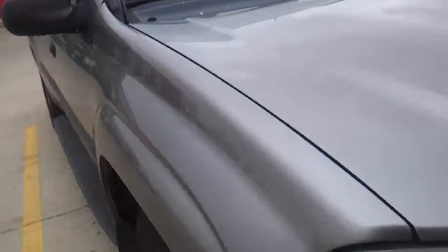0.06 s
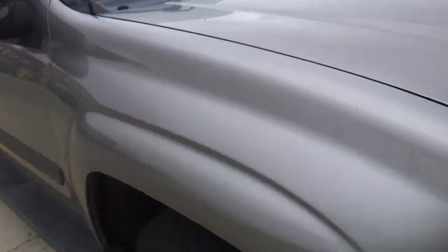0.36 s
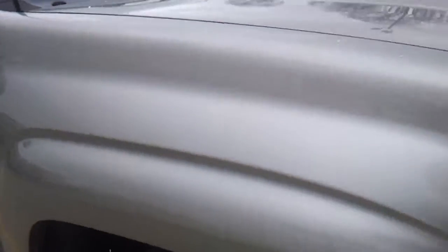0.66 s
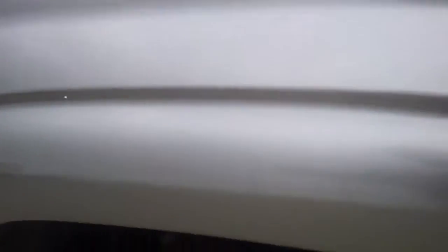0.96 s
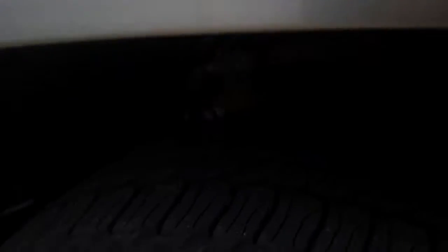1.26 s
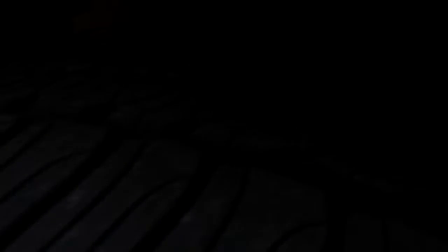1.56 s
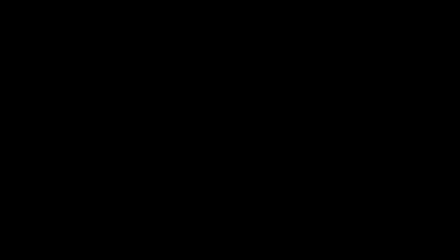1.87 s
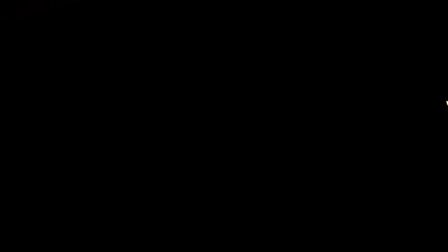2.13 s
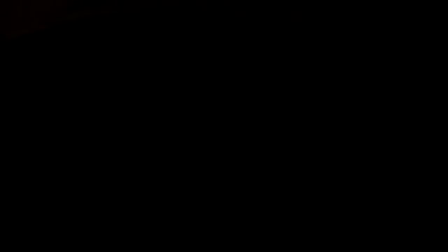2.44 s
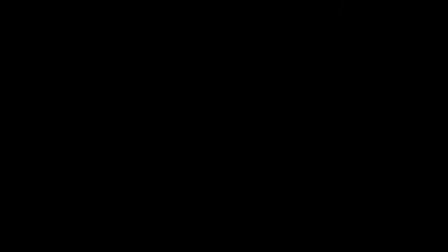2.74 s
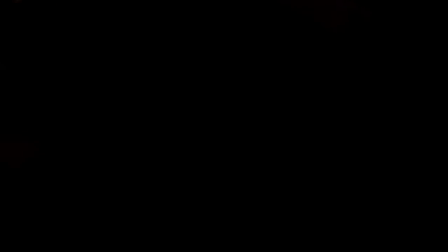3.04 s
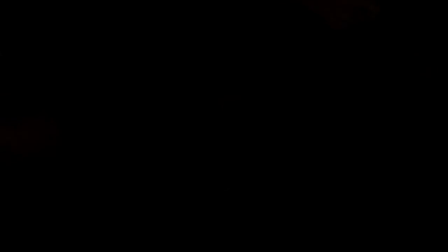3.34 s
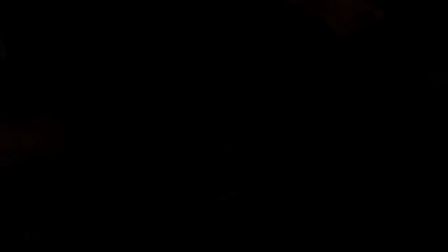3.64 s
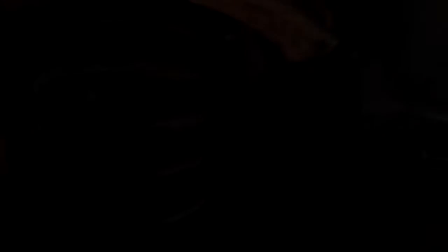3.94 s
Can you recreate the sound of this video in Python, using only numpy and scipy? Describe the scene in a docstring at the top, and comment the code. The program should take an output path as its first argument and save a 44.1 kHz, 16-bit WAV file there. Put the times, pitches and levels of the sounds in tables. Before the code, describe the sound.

An idling car engine ticks steadily over a low throb, swelling as the microphone nears.

```python
"""A car park, close to a V8 idling at about 590 rpm. The stereo microphone starts above the bonnet and
moves down into the wheel well, where the valve ticks, the belt hiss and a steady hum grow.
One valve ticks loudly once per engine cycle, ringing the steel, among the softer clatter of the others.
Uneven firing lays a low exhaust throb underneath. Moving air buffets the microphone ports, mostly the
right one, and light handling makes a few dull knocks early on."""
import sys
import numpy as np
from scipy import signal
from scipy.fft import rfft, irfft
from scipy.io import wavfile

SR = 44100
rng = np.random.default_rng(int(sys.argv[2]) if len(sys.argv) > 2 else 0)


def bounce(signal):
    """Save signal as a 16-bit WAV file at the path given by the first command-line argument."""
    frames = np.transpose(np.atleast_2d(signal))
    limited = np.clip(frames, -1, 1)
    pcm = np.round(limited * 32767).astype(np.int16)
    wavfile.write(sys.argv[1], SR, pcm)


N = 176400
T = np.arange(N) / SR

# The wheel well opening to the microphone. Each row: time in seconds, then treble, midrange, hum in dB.
APPROACH = [(0, -17, -15.5, -19.5), (.6, -17, -13.5, -20.5), (.9, -14, -10.5, -14.5),
            (1.12, -10.5, -10.5, -13), (1.35, -4.5, -5.5, -6.5), (1.65, -2, -1.5, -1), (2.051, -1, 0, 1.5),
            (2.4, 0, -1.5, 1), (2.75, 0, -0.5, 0.5), (3.1, 0.5, -0.5, 2), (3.6, 0.5, -0.5, 0.5),
            (4, 0, -0.5, 0.5)]
TREBLE, MIDRANGE, HUM = 1, 2, 3  # its columns
# How alike the two channels are. Each row: frequency in Hz, likeness from 0 to 1.
LIKENESS = [(60, 0.85), (130, 0.58), (290, 0.88), (630, 0.4), (1390, 0.07), (3000, 0)]
# The engine's lean to one side. Each row: frequency in Hz, left minus right in dB.
BALANCE = [(60, -5.5), (200, -1), (380, -2.5), (690, 0.5), (1270, -0.5), (1850, -4.5), (2600, 3.5),
           (3700, .5), (5000, 2.5), (8000, 2.5), (14600, 6.5)]
# Resonances of the wheel well. Each row: centre in Hz, width in Hz, boost in dB.
WELL_RESONANCES = [(619, 29, 7), (999, 16, 12), (1200, 37, 5), (1360, 130, 6), (1790, 31, 8.5),
                   (2030, 55, 6.5), (2200, 54, 4.5), (3358, 24, 4), (3630, 23, 4.5), (4460, 44, 5),
                   (4760, 47, 2), (6130, 35, 5), (6600, 55, 3.5), (7600, 99, 1.5), (9450, 330, 2.5),
                   (11600, 500, 2.5), (13700, 300, 12)]

# Colours of the noises. Each row: frequency in Hz, relative spectral density in dB.
WIND_COLOUR = [(10, -17), (22, 0), (60, 3), (120, 3), (250, -3), (500, -21), (1200, -60), (4000, -67)]  # air on the microphone ports
SCUFF_COLOUR = [(200, -16), (500, 10), (1000, -5), (1900, -11), (3000, -24), (8000, -50)]  # the scuff in a dull knock
MUFFLED_COLOUR = [(20, -18), (50, -2.5), (110, -3), (160, 4.5), (215, -1.5), (280, -4.5), (420, -8.5),
                  (520, -9), (680, -7), (1000, -13.5), (1750, -14.5), (2400, -24), (5000, -24.5),
                  (8000, -33), (12000, -68)]  # the engine through the bodywork
RUSH_COLOUR = [(30, -18), (100, -5), (180, -9), (255, 3.5), (330, -1), (390, -4.5), (450, -0.5), (530, -7),
               (625, -6.5), (740, -11), (1200, -12), (1550, -18), (2700, -14.5), (3500, -13), (5000, -12.5),
               (7000, -16), (8500, -21), (11500, -29.5), (13000, -38), (15000, -61)]  # belt and fan
CHURN_COLOUR = [(150, -22), (270, 8), (360, -7), (450, -1), (620, -6.5), (900, -32), (3000, -50)]  # low-mid swells in the wheel well
CLATTER_COLOUR = [(1000, 3), (2600, -37.5), (3600, 0.5), (4300, 6), (4700, 1), (5300, 6), (6500, -3.5),
                  (8000, -24), (14000, -40)]  # the softer valves
SCATTER_COLOUR = [(900, -41), (1600, 0.5), (2600, -3), (4500, 3), (7300, 5.5), (8600, -1), (11500, -5),
                  (14500, -15.5)]  # a tick's reflections in the engine bay
CLACK_COLOUR = [(700, -30), (1300, -5), (1750, -1), (2300, -5), (3600, -9), (6000, -33)]  # the valve cover

# Gusts on the ports. Each row: peak time and half length in seconds, level and left minus right in dB.
GUSTS = [(0.687, 0.0082, -14.5, 6), (0.735, 0.014, -15, 19), (0.782, 0.0093, -20, 8),
         (0.925, 0.013, -17.5, 15), (1.184, 0.03, -18, -24), (1.258, 0.024, -11.5, -29),
         (1.618, 0.024, -18, -12), (1.925, 0.015, -16, -16), (2.364, 0.033, -13, -24),
         (2.447, 0.025, -16.5, -8), (2.965, 0.017, -19, -8), (3.213, 0.024, -28, -12)]
# Gusts breaking. Each row: peak time in seconds, pitch in Hz, level and left minus right in dB.
THUMPS = [(0.741, 148, -12, 7), (1.247, 145, -6, -18), (1.264, 110, -10, -16), (2.343, 74, -6, -21),
          (2.852, 112, -6, -13), (2.979, 99, -6, -12)]
# Short dull knocks: light handling early on, then the midrange bump of the strong gust near 1.24 s.
# Each row: start in seconds, pitch in Hz, level in dB.
KNOCKS = [(.068, 730, -20), (.131, 634, -20), (.241, 670, -21), (.252, 880, -24), (.361, 567, -29),
          (.606, 590, -25), (1.22, 526, -21), (1.238, 440, -18.5)]
# Midrange through the bodywork. Each row: time in seconds, gain in dB.
MUFFLED_MIDRANGE = [(0, 2.5), (.15, 3), (.3, 1), (.45, 1), (.7, 2.5), (1.1, -1), (1.5, 3.5), (4, -0.5)]
# Tones of the exhaust. Each row: multiple of the engine cycle rate, level in the wheel well in dB.
EXHAUST_ORDERS = [(8, -36.5), (11, -40.5), (13, -37.5), (16, -32), (18, -45), (21, -26.5), (22, -40),
                  (24, -27.5), (28, -33), (42, -32.5), (51, -36.5)]
# Swells of the churn. Each row: peak time in seconds, level in dB.
CHURN_SWELLS = [(2.06, -16.5), (2.275, -17.5), (2.48, -17), (2.9, -17), (3.09, -18)]
# Two ringing bands of the valve train, upper first. Each row: centre in Hz, width in Hz.
RATTLE_BANDS = [(4710, 490), (3500, 310)]
# Those bands as the microphone moves. Each row: time in seconds, upper and lower level in dB.
RATTLE_LEVELS = [(0, -56, -60), (.7, -50, -60), (1, -41, -57), (1.4, -36, -42), (2.4, -32, -46),
                 (3.1, -38, -39), (3.7, -40, -33), (4, -38, -39)]
# The softer valves. Each row: place in the cycle from 0 to 1, relative level in dB,
# amount of bright scatter from 0 to 1, ping pitch in Hz.
SOFT_VALVES = [(.115, 0.5, 0.76, 4200), (.228, 4, 0.24, 4700), (0.351, 3, 0.65, 5090),
               (.478, 3, 0.14, 4700), (.588, -1.5, 0, 4670), (.722, 1.5, 0, 4800), (0.859, 2, 0, 3600),
               (0.963, 4, 0.1, 4400)]
# Valve closings that ring out clearly. Each row: start in seconds, pitch in Hz, relative level in dB.
CLEAR_PINGS = [(1.718, 4320, -13), (1.875, 4990, -12), (1.904, 4650, -14), (1.926, 5140, -17),
               (1.953, 4420, -14), (2.078, 5230, -10), (2.108, 4870, -16), (2.26, 4900, -8.5),
               (2.273, 3330, -15), (2.359, 4600, -9.5), (2.482, 4840, -15), (2.515, 4670, -12.5),
               (2.613, 4700, -11), (2.666, 4750, -13), (2.766, 4680, -15), (2.797, 3625, -19),
               (2.836, 3600, -17), (2.892, 4600, -12), (2.916, 4800, -12), (2.995, 4500, -9),
               (3.07, 4760, -20), (3.121, 4680, -18), (3.273, 4720, -9), (3.366, 3580, -16),
               (3.414, 3580, -12), (3.51, 3400, -15), (3.539, 3560, -12), (3.702, 4630, -8.5),
               (3.774, 3670, -17), (3.906, 5100, -23), (3.987, 4520, -15)]
# The loud valve, once per cycle. Each row: time in seconds, then relative level, ring and clack in dB.
LOUD_TICKS = [(0.19, -21.5, -7, 12), (.389, -24, -2, -5), (0.594, -21, -6, -5), (0.796, -15.5, -8, -8),
              (0.998, -21.5, 3, -8), (1.204, -15, -7, -8), (1.402, -11, -4, 3.5), (1.602, -2, -4, 1.5),
              (1.805, -9, 0.5, -8), (2.008, 1, -7, -5), (2.213, -.5, -1, -0.5), (2.414, -6, -4.5, 5),
              (2.617, -3.5, -3, -15), (2.819, -2, 1.5, -1), (3.024, -5, -5, 1), (3.227, -1.5, -1.5, -12),
              (3.431, -2.5, 1.5, -4), (3.632, -1.5, -1.5, -13), (3.8349, -3, 5, 0)]
# Contacts within a loud tick. Each row: offset in seconds, gain of scatter and clack in dB, ring in dB.
CONTACTS = [(-.0065, -10, -4), (-.003, 0.5, 8), (-.0008, 3.5, 5.5), (.0012, -5.5, 1)]
# Steel modes of the loud valve. Each row: frequency in Hz, relative level in dB, T60 in seconds.
VALVE_MODES = [(4660, 2.5, 0.0086), (6350, -6, 0.0081), (6890, 0, 0.024), (7330, 0.5, 0.016),
               (7630, 2, 0.0053), (11330, -14, .01), (13900, -15, .012)]

SCATTER_RISE_S, SCATTER_T60_S = .0007, .048
CLATTER_RISE_S, CLATTER_T60_S = .0018, .091
PING_RISE_S, PING_T60_S = .0015, .04
IMPACT_SAMPLES = 4096
FREQS = np.fft.rfftfreq(N, 1 / SR)


def amp(db):
    """Decibels to gain."""
    return 10 ** (np.asarray(db) / 20)


def unit(x):
    """Scales to rms 1."""
    return x / np.sqrt(np.mean(x ** 2) + 1e-20)


def read(points, hz):
    """Reads a table on a log-frequency axis."""
    freqs, values = np.transpose(points)
    return np.interp(np.log(hz + 1), np.log(freqs), values)


def add(mix, start_s, sound):
    """Mixes a stereo sound in at its start time."""
    at = round(start_s * SR)
    if 0 <= at < N:
        mix[:, at:at + sound.shape[1]] += sound[:, :N - at]


def drift(hz):
    """A random wander of rms 1, mostly slower than the given rate."""
    return unit(irfft(rfft(rng.standard_normal(N)) * np.exp(-(FREQS / hz) ** 2) * (FREQS > 0), N))


def noise(colour, resonances=(), size=N):
    """Stereo noise of rms 1 with a colour and resonances, the channels alike in the bass."""
    hz = np.fft.rfftfreq(size, 1 / SR)
    left, separate = rfft(rng.standard_normal((2, size)))
    likeness = np.clip(read(LIKENESS, hz), 0, 1)
    right = likeness * left + np.sqrt(1 - likeness ** 2) * separate
    boost_db = sum(db / (1 + (2 * (hz - centre) / width) ** 2) for centre, width, db in resonances)
    return unit(irfft(np.array([left, right]) * amp(read(colour, hz) + boost_db), size))


def swell(peak_s, half_s):
    """A bell-shaped rise and fall."""
    return np.exp(-((T - peak_s) / half_s) ** 2 / 2)


def strike(rise_s, t60_s, size=IMPACT_SAMPLES):
    """Envelope of an impact: a quick rise and a decay of 60 dB in t60_s."""
    return (1 - np.exp(-T[:size] / rise_s)) * np.exp(-np.log(1000) * T[:size] / t60_s)


def burst(colour, rise_s, t60_s):
    """One impact scattered into dense reflections by the engine bay."""
    return noise(colour, WELL_RESONANCES, IMPACT_SAMPLES) * strike(rise_s, t60_s)


def ping(hz, rise_s=PING_RISE_S, t60_s=PING_T60_S, size=IMPACT_SAMPLES):
    """A small steel part rings briefly at one pitch, in a different phase on each channel."""
    return strike(rise_s, t60_s, size) * np.sin(2 * np.pi * (hz * T[:size] + rng.random((2, 1))))


def pan(side_db):
    """Left and right gains that turn the far side down."""
    return amp(np.minimum([[side_db], [-side_db]], 0))


def approach(column):
    """Gain of the treble, midrange or hum as the microphone goes down into the wheel well."""
    rows = np.array(APPROACH)
    return amp(np.interp(T, rows[:, 0], rows[:, column]))


def cycle_starts():
    """Start of every engine cycle in seconds, with one more at either end."""
    ticks = np.array(LOUD_TICKS)[:, 0]
    period = np.diff(ticks).mean()
    return np.r_[ticks[0] - period, ticks, ticks[-1] + period]


def bodywork_shadow(sound, above_hz=9800, full_shadow_db=-9):
    """The bodywork hides the top treble while the microphone is above it."""
    top = irfft(rfft(sound) / (1 + (above_hz / (FREQS + 1)) ** 10), N)
    hidden = 1 - np.minimum(2 * approach(TREBLE), 1)
    return sound + top * (amp(full_shadow_db * hidden) - 1)


def wind(draught_db=-27.5):
    """Short gusts on the microphone ports, and a steady draught on the right one in the wheel well."""
    strength = sum(amp(db) * pan(side_db) * swell(s, half_s) for s, half_s, db, side_db in GUSTS)
    strength[1] += amp(draught_db) * approach(MIDRANGE)
    return strength * np.array([noise(WIND_COLOUR)[0], noise(WIND_COLOUR)[0]])


def wind_thumps(half_cycles=.67):
    """An eddy pushes on the ports for two or three slow swings."""
    out = np.zeros((2, N))
    for s, hz, db, side_db in THUMPS:
        swing = np.sin(2 * np.pi * ((T - s) * hz + rng.random()))
        out += amp(db) * pan(side_db) * swell(s, half_cycles / hz) * swing
    return out


def dull_knocks(ring_db=-2):
    """Light handling, then the strong gust, bump the microphone: each a soft scuff with a short ring."""
    out = np.zeros((2, N))
    envelope = strike(rise_s=.003, t60_s=.065)
    for s, hz, db in KNOCKS:
        ring = amp(ring_db) * np.sin(2 * np.pi * hz * T[:IMPACT_SAMPLES])
        scuff = noise(SCUFF_COLOUR, size=IMPACT_SAMPLES)
        add(out, s, amp(db) * envelope * (ring + scuff))
    return out


def muffled_engine(level_db=-26.5, mid_band_hz=(580, 3000)):
    """Dull engine noise through the bodywork, its midrange shifting as the microphone moves."""
    body = amp(level_db) * noise(MUFFLED_COLOUR)
    mid = signal.sosfiltfilt(signal.butter(2, mid_band_hz, "bandpass", fs=SR, output="sos"), body)
    mid_gain = amp(np.interp(T, *np.transpose(MUFFLED_MIDRANGE)))
    return body + mid * (mid_gain - 1)


def exhaust_throb(waver=.4):
    """Uneven firing gives low tones locked to the engine cycle, each wavering in level."""
    starts = cycle_starts()
    cycles = np.interp(T, starts, np.arange(len(starts)))
    tones = sum(amp(db) * (1 + waver * drift(4.6)) * np.sin(2 * np.pi * (order * cycles + rng.random()))
                for order, db in EXHAUST_ORDERS)
    return tones * approach(MIDRANGE) ** .99


def belt_and_fan(level_db=-18, flutter_db=1.33, split_hz=2500):
    """Belt and fan rush coming straight through the wheel well; its treble opens last."""
    rush = amp(level_db + flutter_db * drift(55)) * noise(RUSH_COLOUR, WELL_RESONANCES)
    low = signal.sosfiltfilt(signal.butter(2, split_hz, fs=SR, output="sos"), rush)
    return low * approach(MIDRANGE) + (rush - low) * approach(TREBLE)


def churn():
    """Down in the wheel well, the low-mid rush swells for a moment now and then."""
    return noise(CHURN_COLOUR) * sum(amp(db) * swell(s, half_s=.012) for s, db in CHURN_SWELLS)


def alternator_hum(hz=359.6, waver_hz=1.0, level_db=-18.5, flutter=.11):
    """A belt-driven part, likely the alternator, hums on one slightly wavering note."""
    turns = np.cumsum(hz + waver_hz * drift(4.6)) / SR
    return amp(level_db) * approach(HUM) * (1 + flutter * drift(30)) * np.sin(2 * np.pi * turns)


def valve_train_rattle(flutter_db=3):
    """Many small contacts keep two steel resonances ringing, in quick flutters."""
    out = np.zeros((2, N))
    times, *levels = np.transpose(RATTLE_LEVELS)
    for (centre, width), db in zip(RATTLE_BANDS, levels):
        contacts = rfft(rng.standard_normal((2, N)))
        ring = unit(irfft(contacts / (1 + (2 * (FREQS - centre) / width) ** 2), N))
        out += ring * amp(np.interp(T, times, db)) * unit(amp(flutter_db * drift(60)))
    return out


def soft_valves(level_db=-22, spread_db=.8, jitter_s=.00091, ping_db=-1.5):
    """The softer valves fill each cycle in a fixed pattern, each with a small ping; some ring out."""
    out, starts = np.zeros((2, N)), cycle_starts()
    for start, period in zip(starts, np.diff(starts)):
        for place, db, bright, hz in SOFT_VALVES:
            late_s, stray_db = rng.standard_normal(2) * (jitter_s, spread_db)
            clatter = (1 - bright / 2) * burst(CLATTER_COLOUR, CLATTER_RISE_S, CLATTER_T60_S)
            scatter = bright * burst(SCATTER_COLOUR, SCATTER_RISE_S, SCATTER_T60_S)
            tick = clatter + scatter + amp(ping_db) * ping(hz)
            add(out, start + place * period + late_s, amp(level_db + db + stray_db) * tick)
    for s, hz, db in CLEAR_PINGS:
        add(out, s, amp(db) * (ping(hz) + .45 * burst(CLATTER_COLOUR, CLATTER_RISE_S, PING_T60_S)))
    return out * approach(TREBLE) ** .94


def loud_valve(ring_trim_db=-15.5, scatter_trim_db=-15.5, clack_trim_db=-20.52):
    """Each tick is a few quick contacts that ring the steel and scatter, over a clack of the cover."""
    out = np.zeros((2, N))
    for s, db, ring_db, clack_db in LOUD_TICKS:
        for offset_s, contact_db, contact_ring_db in CONTACTS:
            ring = sum(amp(mode_db) * ping(hz, rise_s=.0002, t60_s=t60_s, size=2048)
                       for hz, mode_db, t60_s in VALVE_MODES)
            add(out, s + offset_s, amp(db + ring_trim_db + ring_db + contact_ring_db) * ring)
            scatter = amp(scatter_trim_db) * burst(SCATTER_COLOUR, SCATTER_RISE_S, SCATTER_T60_S)
            clack = amp(clack_trim_db + clack_db) * burst(CLACK_COLOUR, SCATTER_RISE_S, t60_s=.064)
            add(out, s + offset_s, amp(db + contact_db) * (scatter + clack))
    return out


def scene():
    """The engine close up, leaning left in the treble and right in the bass, plus wind and handling."""
    valves = loud_valve() + soft_valves() + valve_train_rattle()
    engine = bodywork_shadow(valves + belt_and_fan() + muffled_engine())
    engine = engine + exhaust_throb() + alternator_hum() + churn()
    lean_db = read(BALANCE, FREQS)
    engine = irfft(rfft(engine) * amp([lean_db / 2, -lean_db / 2]), N)
    return engine + wind() + wind_thumps() + dull_knocks()


def record(dry):
    """The recorder limits at full scale, then cuts the treble above 14850 Hz."""
    lowpass = signal.firwin(511, 14850, window=("kaiser", 9), fs=SR)
    return signal.oaconvolve(np.clip(dry, -1, 1), lowpass[None], "same")


dry = scene()
out = record(dry)
bounce(out)
```